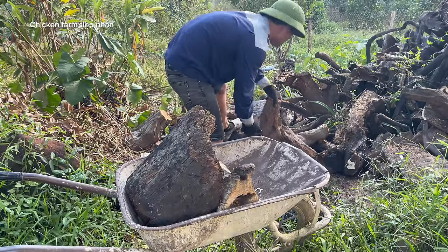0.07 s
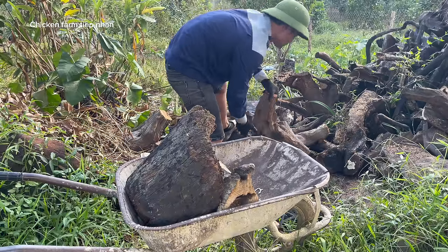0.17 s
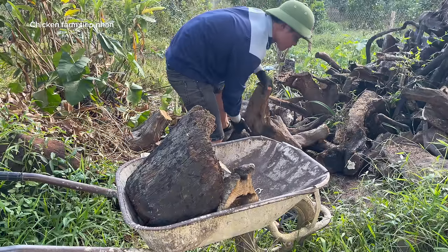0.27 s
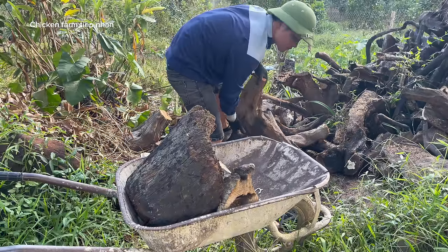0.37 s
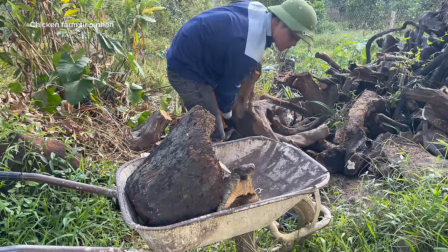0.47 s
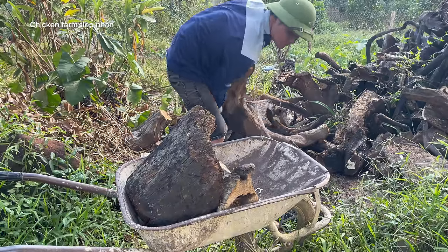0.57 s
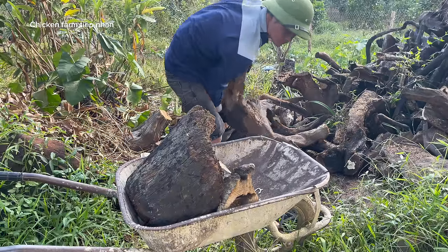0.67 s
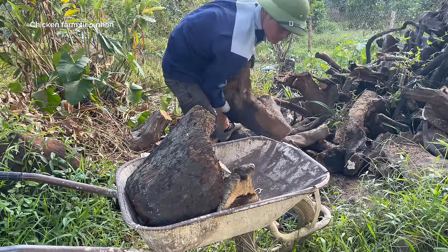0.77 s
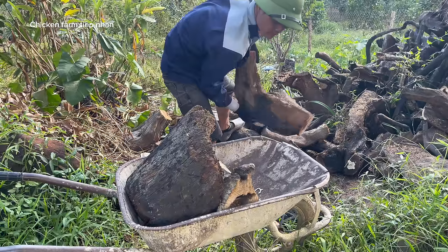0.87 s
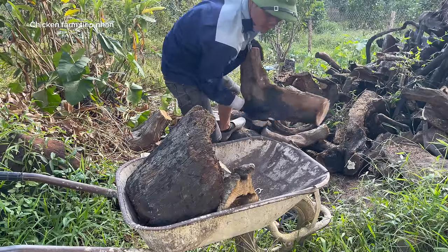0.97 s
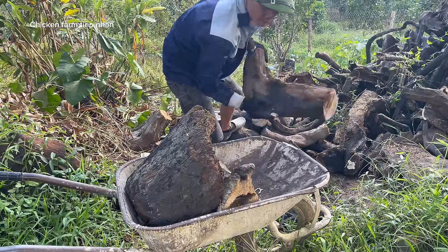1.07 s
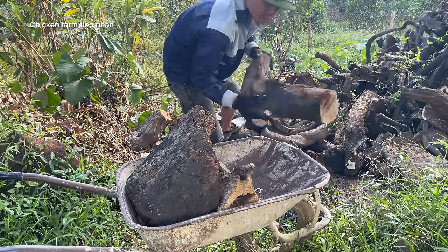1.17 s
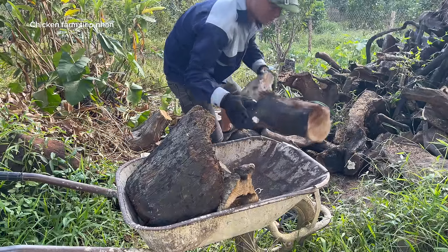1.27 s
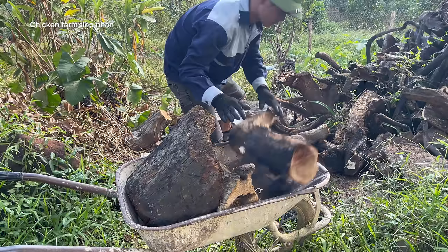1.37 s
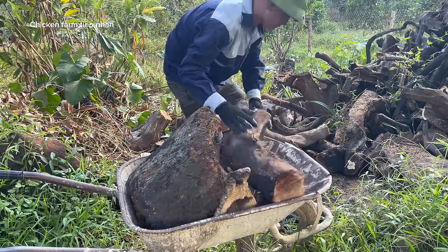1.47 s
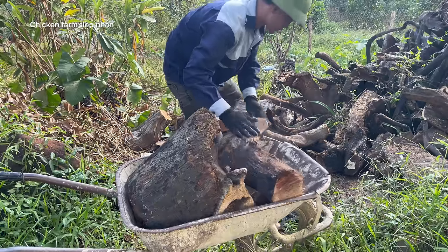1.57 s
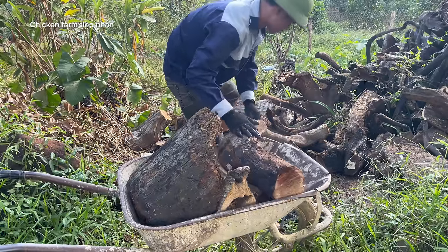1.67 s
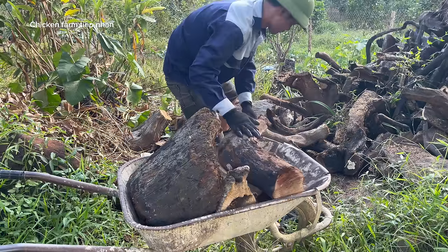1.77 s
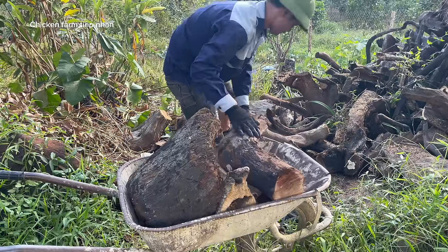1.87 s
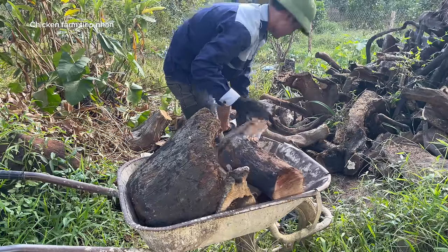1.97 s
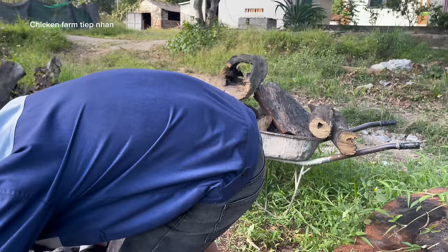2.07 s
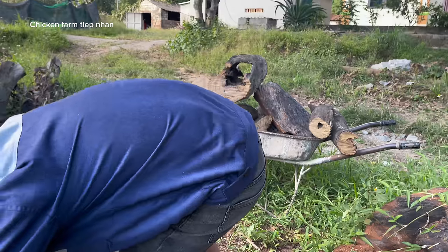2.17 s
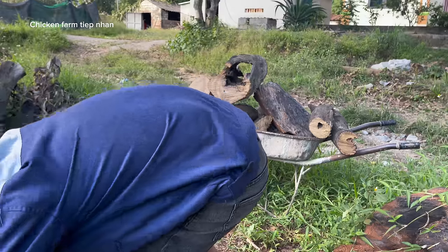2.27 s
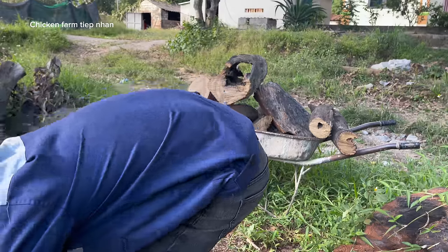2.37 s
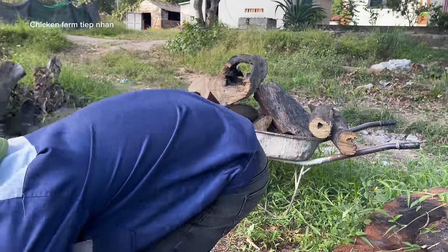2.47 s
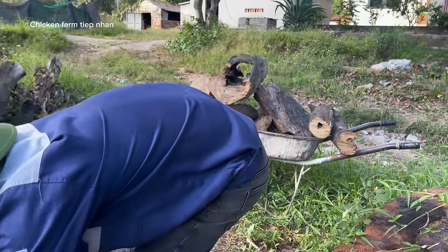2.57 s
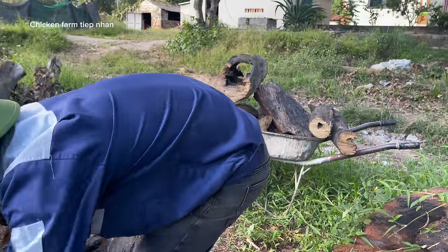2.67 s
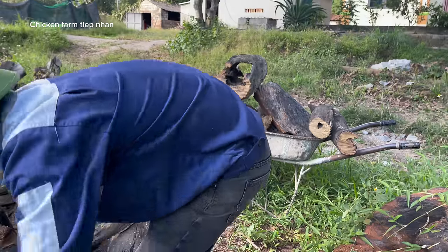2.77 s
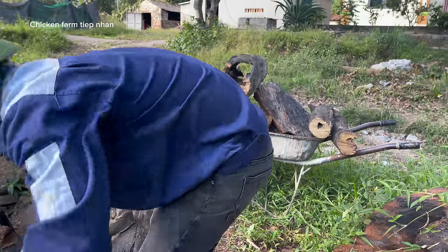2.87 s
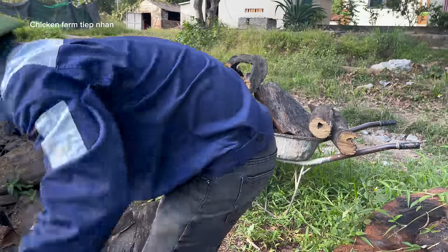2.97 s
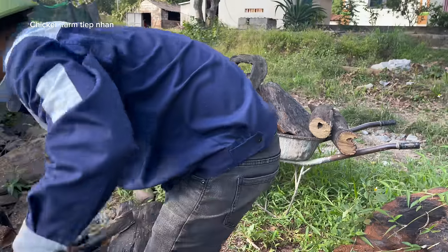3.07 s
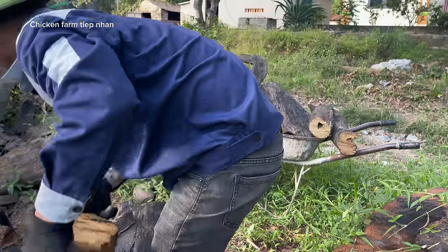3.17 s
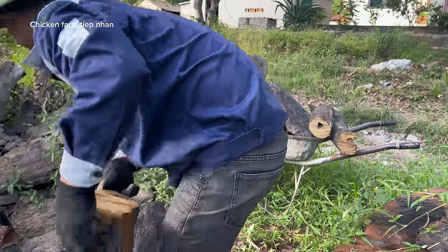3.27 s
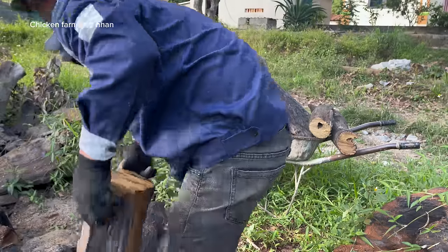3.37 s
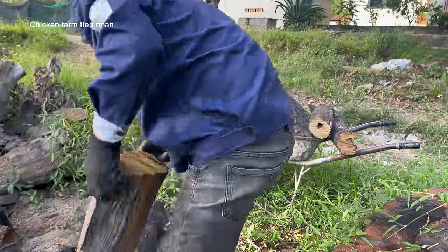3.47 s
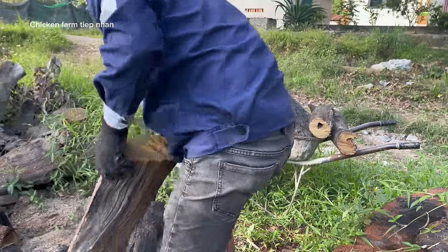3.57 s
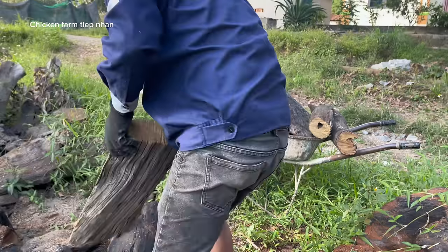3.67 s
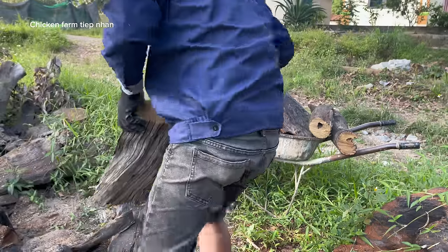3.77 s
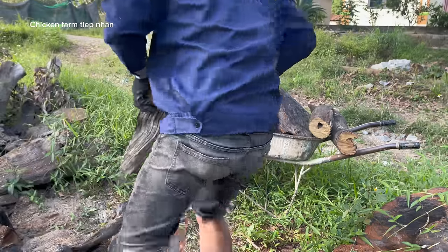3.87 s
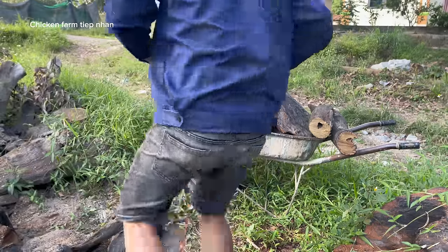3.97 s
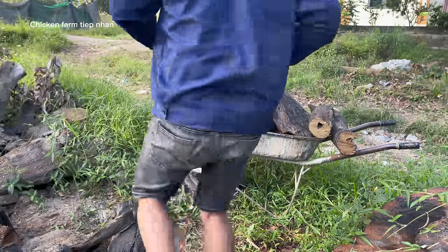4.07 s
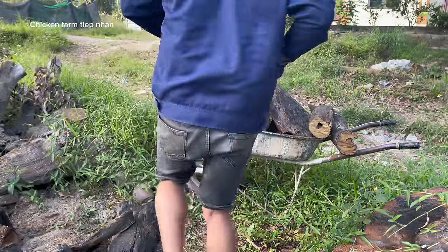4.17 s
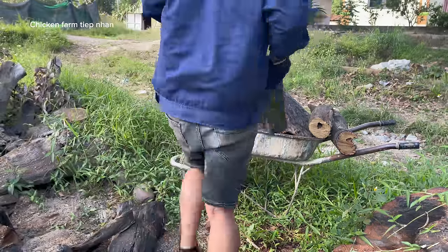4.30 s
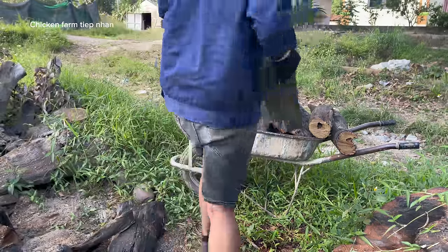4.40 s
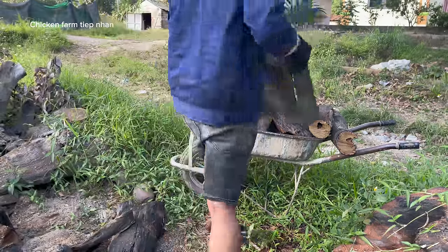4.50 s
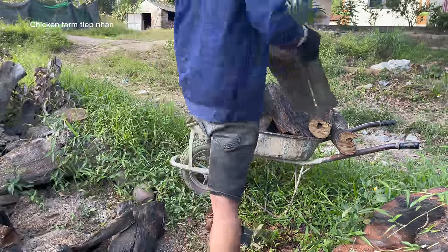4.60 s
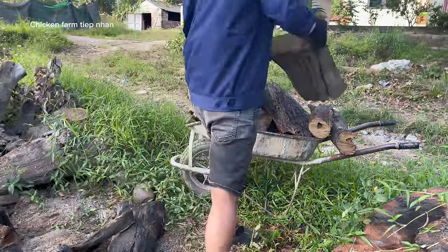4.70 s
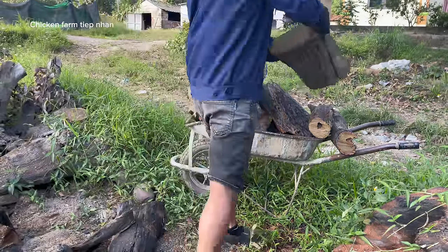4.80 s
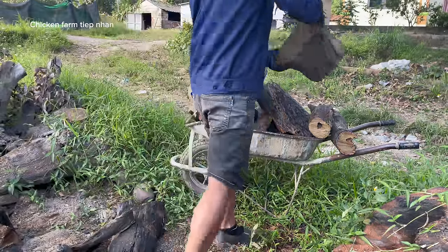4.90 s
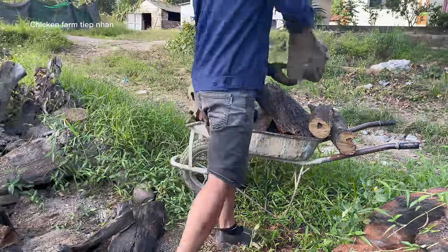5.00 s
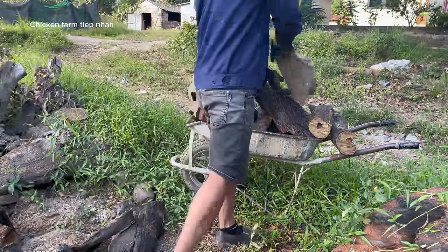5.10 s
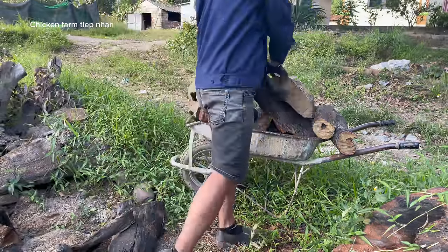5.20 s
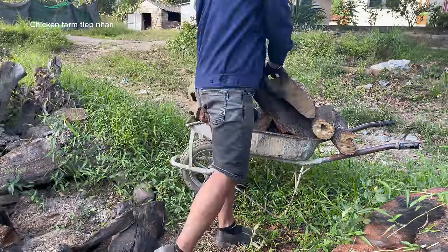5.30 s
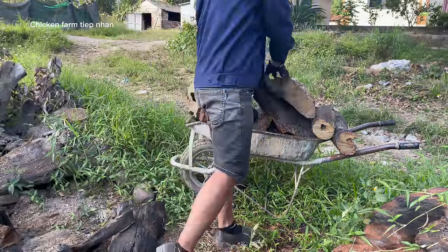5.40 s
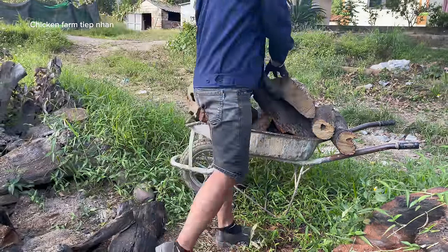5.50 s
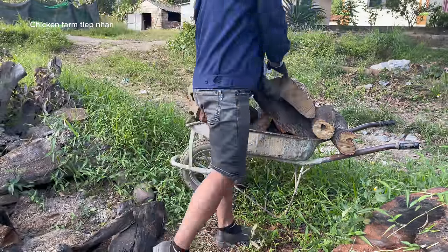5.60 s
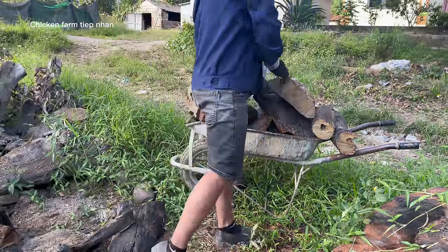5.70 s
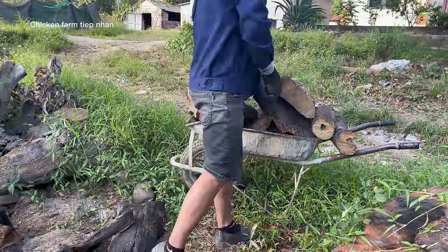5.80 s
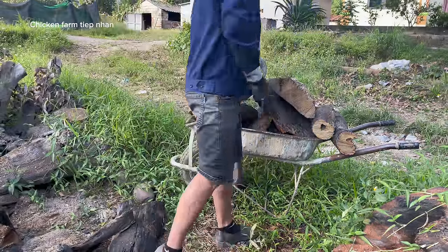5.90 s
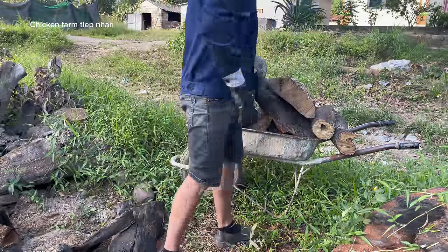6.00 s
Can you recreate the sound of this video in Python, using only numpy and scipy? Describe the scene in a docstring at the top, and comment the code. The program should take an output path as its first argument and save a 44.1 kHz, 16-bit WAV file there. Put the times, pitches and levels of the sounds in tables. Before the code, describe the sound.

Soft wind rumble, a faint high insect trill and light log scuffs come first. A log crashes into a hollow metal tray, booming, rocking and rattling away within about half a second. After that, dry grass crackles, twigs snap and wood bumps as a worker pulls and carries another piece, then throws it onto piled wood with a quieter, damped knock and metallic clatter. Dry open air, close stereo pickup.

```python
"""Farm plot: a log drops into a nearly empty steel wheelbarrow, which bangs, rocks and rattles as decaying modes.
More wood is pulled from a heap, carried through grass and thrown on the now loaded barrow.
Wood knocks are short modes, twigs and bark snap as noise bursts, grass and clothes rustle as grainy noise.
Wind is low noise, the drone a wavering tone with noise around it, the insect a pulsed high tone."""
import sys
import numpy as np
from scipy import signal
from scipy.fft import rfft, irfft, next_fast_len
from scipy.io import wavfile
from scipy.ndimage import map_coordinates

SR = 44100
rng = np.random.default_rng(int(sys.argv[2]) if len(sys.argv) > 2 else 0)


def file_out(sig):
    """Save sig as 16-bit WAV at sys.argv[1]."""
    # one column per channel
    cols = np.atleast_2d(sig).T
    # limit, then scale
    lim = np.clip(cols, -1, 1)
    pcm = np.round(lim * 32767).astype(np.int16)
    wavfile.write(sys.argv[1], SR, pcm)


N = 266716

# Levels are before placing. Spectra and mode levels are relative: the sound is normalised after them.
# Log landing or bumping in the barrow: start_s, ring_db, thump_db, rattle_db, bark_db
BLOWS = [(1.462, -20.5, -25, -17, -34), (1.4684, -9.5, -12.5, -17.5, -20.5),
         (1.480, -13.5, -15, -28.5, -21), (1.503, -17, -40, -31, -21), (1.513, -22.5, -14.5, -21.5, -19),
         (1.609, -26, -45, -39, -53), (1.649, -31.5, -23, -29.5, -34), (1.667, -28, -26, -30, -54),
         (1.757, -43, -32, -37, -47), (1.846, -70, -53, -45.5, -45), (5.171, -42.5, -42.5, -33, -27.5),
         (5.179, -28.5, -38.5, -34, -48.5), (5.1894, -17, -23.5, -27, -22), (5.204, -22, -19, -32.5, -33.5),
         (5.229, -31.5, -21.5, -30.5, -34), (5.382, -60, -41, -46.5, -51.5), (5.482, -61, -62, -50.5, -57)]
# Run of ever weaker contacts: start_s, fall_db_per_s, ring_db, thump_db, rattle_db, bark_db
ROCKS = [(1.543, 105, -27.5, -31, -24, -23.5), (1.693, 165, -26.5, -22, -32, -33),
         (5.276, 236, -33.5, -30, -36.5, -48.5)]
# Main modes, barrow with one log in it: pitch_hz, level_db, t60_s
LIGHT_MODES = [(233, -2.5, 0.22), (281, -5, 0.15), (305.8, -1, 0.17), (350, 2.5, 0.25), (406, -0.5, 0.23),
               (465, 1, 0.34), (490, -1.5, 0.35), (569, -5, 0.36), (606, -0.5, .3), (847, -8.5, 0.46),
               (920, -10, 0.36), (1004, -14, .4), (1004, -16, 0.26), (1270, -36, .5), (1338, -28, 0.97),
               (1347, -20, 0.6), (2025, -19, 0.54)]
# Main modes, barrow piled with wood: pitch_hz, level_db, t60_s
LOADED_MODES = [(253.7, -13, 0.12), (282, 2.5, 0.17), (363, -4, 0.091), (460, -13.5, .17),
                (517.4, 3.5, .28), (570, -3, 0.11), (700, -10.5, 0.096), (724, 2, .12), (831, 0, 0.25),
                (885, -14, 0.29), (1080, 5.5, 0.03), (1182, 2.5, 0.19), (1406, -11, 0.45),
                (2075, -25.5, 0.15)]
# Crowd of weaker sheet modes: pitch_hz, level_db
SHEET_LEVELS = [(120, -13.5), (200, -0.5), (400, 0), (620, 3), (760, -8.5), (950, -5), (1200, -10),
                (2000, -12), (3000, -12.5), (5000, -19)]
# Loose-part rattle, also wood scuff: frequency_hz, density_db_per_hz
RATTLE_SPECTRUM = [(350, -29.5), (700, 1), (1000, -1), (1600, 0.5), (2500, -5.5), (4300, -12), (5500, -21),
                   (9000, -30.5), (12000, -46)]
# Bark crushed by a blow: frequency_hz, density_db_per_hz
BARK_SPECTRUM = [(1000, -17.5), (2500, -5), (4200, -2), (5500, -4), (7000, -4), (9000, 2), (10300, 4),
                 (11500, -6), (12600, -15), (13200, -65)]
# Swings of a thump: pitch_ratio, gain
THUMP_SWINGS = [(0.63, -0.3), (1, 0.51), (1.35, -0.48), (1.95, 0.33)]
# Wood on wood: start_s, lower_mode_db, lower_hz, upper_hz, then relative to the lower mode upper_db,
# t60_s, and again relative to it thud_db, scuff_db
KNOCKS = [(0.048, -42, 710, 1530, 3, 0.039, -19, -2), (1.923, -26.5, 513.5, 2100, -14, 0.11, -22.5, -11.5),
          (2.447, -45, 1380, 1676, -0.5, 0.12, -12, -4), (2.470, -42.5, 816, 1690, -16, 0.026, -11, -9),
          (2.624, -37.5, 400, 1300, -5, 0.057, 2.5, -14), (2.763, -47.5, 868, 1087, 5, 0.19, -11, -3.5),
          (2.828, -49.5, 880, 1275, 4, 0.043, 9.5, -1), (3.073, -37, 264.3, 567, -23, 0.151, 5.5, -10),
          (3.095, -26, 560, 2085, -9, 0.027, -3.5, -4.5), (3.139, -41, 670, 1980, -26, 0.088, -13, -12),
          (3.954, -34.5, 608, 1070, -1, 0.068, -3, -13), (3.957, -32, 356, 498, -1, 0.046, -13, -20),
          (3.963, -39, 1125, 2360, -5, 0.056, -10, -17), (5.1895, -8.5, 580, 896, 0.5, 0.049, -22, -16.5),
          (5.192, -15.5, 1516, 1954, -6, 0.042, -16, -8), (5.276, -22, 1170, 2220, -9, 0.018, -21, -4)]
# Light clack of thin sticks: start_s, lower_mode_db, lower_hz
TAPS = [(0.147, -58, 1760), (0.221, -63, 1830), (0.368, -61, 1950), (0.508, -52.5, 1937), (2.017, -47, 983),
        (2.247, -51, 1407), (2.284, -50.5, 1594), (2.363, -47.5, 1620), (2.714, -61, 1340),
        (4.983, -55, 1390), (5.891, -56, 1186), (5.995, -61, 1184)]
# Twig and bark snaps: start_s, level_db (before SNAP_TRIM_DB), tilt_db_per_octave
SNAPS = [(.049, -31, -7), (2.2455, -30, 13.5), (2.446, -27, 2.5), (2.470, -41, -4), (2.62, -36, -2),
         (2.708, -35.5, 2.5), (2.761, -24.5, 6), (2.776, -29, 10.5), (2.825, -31, 11.5), (3.096, -32.5, 7),
         (3.369, -42, 13.5), (3.546, -41.5, -1.5), (3.724, -37.5, 10), (3.767, -40, 12), (3.859, -34, 2.5),
         (4.503, -35.5, -5), (4.543, -30.5, -5), (4.56, -24.5, -1.5), (5.012, -41, -5.5), (5.134, -41.5, 7),
         (5.556, -41, -1.5), (5.807, -42, -2.5)]
# Twig snap noise, before tilt: frequency_hz, density_db_per_hz
TWIG_SPECTRUM = [(400, -32), (1200, -5), (2500, -7), (4200, 3.5), (6000, -2.5), (9000, 8.5), (10300, 11.5),
                 (12300, -19.5), (13500, -29.5), (15500, -20.5)]
# Log tugged over the heap, catching and sliding: start_s, grass_db, wood_db (before WOOD_TRIM_DB)
TUGS = [(.02, -58, -56), (.21, -58, -56), (.366, -64.5, -66), (0.515, -61.5, -59), (2.246, -42.5, -55.5),
        (2.358, -44, -51), (2.442, -52, -60), (2.7, -45, -48.5), (2.759, -45, -48.5)]
# Feet and logs brushing through grass and sticks: middle_s, half_length_s, grass_db, wood_db (before WOOD_TRIM_DB)
BRUSHES = [(1.349, 0.047, -54.5, -58.5), (2.141, 0.043, -54, -71), (2.577, 0.038, -64, -64),
           (3.019, 0.027, -55.5, -51), (3.107, 0.0544, -47.5, -51.5), (3.199, 0.042, -53, -62.5),
           (3.603, 0.017, -54.5, -74.5), (3.863, .045, -51.5, -56.5), (4.025, 0.13, -51, -57),
           (4.354, 0.039, -48, -60), (4.519, 0.05, -50.5, -55), (4.634, 0.057, -56, -59),
           (4.827, 0.041, -61.5, -79.5), (5.151, 0.018, -56.5, -53), (5.922, 0.0086, -61, -56)]
# Steady stir of the worker: time_s, grass_and_cloth_db, dragged_wood_db (before WOOD_TRIM_DB)
STIR = [(0, -68.5, -65), (.75, -81, -72), (1.42, -71.5, -66), (1.95, -59.5, -52), (2.22, -64.5, -63.5),
        (2.5, -57.5, -57.5), (3.0, -60.5, -62.5), (3.4, -64.5, -70), (4.3, -59, -65.5), (5.0, -67, -65.5),
        (6.05, -63, -67)]
# Dry grass noise: frequency_hz, density_db_per_hz
GRASS_SPECTRUM = [(1200, -24), (2300, -7.5), (4000, -8.5), (6000, -5), (8000, 0.5), (10000, 7),
                  (10800, 5.5), (12000, -14), (13000, -26.5), (14500, -48)]
# Dragged wood noise: frequency_hz, density_db_per_hz
DRAG_SPECTRUM = [(120, -46), (200, -2.5), (296, 5), (426, -0.5), (849, -3.5), (993, -11.5), (1060, -7),
                 (1830, -6), (4500, -12), (5850, -46.5), (9900, -120)]
# Jacket sleeves sweeping past the body: middle_s, half_length_s, level_db
SWISHES = [(0.976, 0.15, -65), (1.35, 0.06, -64.5), (4.36, 0.063, -61.5), (4.98, 0.13, -63.5),
           (5.91, 0.024, -54.5)]
# Cloth noise: frequency_hz, density_db_per_hz
CLOTH_SPECTRUM = [(300, -12), (900, -7), (2500, -2), (4200, -2.5), (5500, -13.5), (9500, 1.5), (12500, -37)]
# Gusts on the microphone: time_s, level_db (before WIND_TRIM_DB)
WIND = [(0, -54), (1.1, -73), (2.2, -67), (2.8, -63.5), (3.2, -68), (4.8, -69), (5.7, -66), (6.05, -69.5)]
# Wind rumble: frequency_hz, density_db_per_hz
WIND_SPECTRUM = [(15, -18.5), (30, -18), (50, -2), (80, -7.5), (130, -8.5), (220, -22), (400, -38),
                 (900, -83.5)]
# Low drone: time_s, level_db (before DRONE_TRIM_DB), mean_pitch_hz
DRONE = [(0, -70, 57.98), (.5, -55.5, 52.01), (.9, -46.5, 53.04), (1.35, -48, 52.94), (1.9, -49.5, 65),
         (3.2, -50.5, 66), (3.7, -56, 66.05), (4.15, -47.5, 66.02), (4.42, -48.5, 66.3), (4.55, -60, 65.7),
         (4.68, -44.5, 65.1), (4.8, -50, 66.36), (5.15, -51, 65.7), (5.55, -60, 66.24), (5.75, -54, 65.1),
         (6.05, -54, 66)]
# Noise around the drone: frequency_hz, density_db_per_hz
HUM_SPECTRUM = [(30, -41), (48, -14), (64, 1.5), (85, -6), (120, -11), (180, -20.5), (400, -47.5),
                (900, -79.5)]
# Open-air hiss: frequency_hz, density_db_per_hz
AIR_SPECTRUM = [(150, 3.5), (400, 3), (800, -4), (1200, -8), (2000, -14), (4000, -21.5), (6000, -38),
                (9800, -21.5), (11000, -34), (12500, -63)]
# Barrow position: frequency_hz, left_minus_right_db
BARROW_LEFT = [(100, 1.5), (1000, 1.9), (2000, 1.5), (3800, 4), (5300, 4.5), (7200, 6.5), (7900, 2.2),
               (12000, -1.5)]
# Worker position: frequency_hz, left_minus_right_db
WORKER_LEFT = [(100, 2), (500, 4), (1900, 4.5), (5300, 6), (7200, 4.5), (7900, 1.3), (12000, -1)]
# Phase between the two ports: frequency_hz, left_lead_rad
PORT_LEAD = [(1900, 0), (3000, .6), (4000, .1), (7100, .05), (7800, .7), (8700, -.2), (9500, -2),
             (10200, -3.1), (11000, -4.3), (11800, -6.28)]
# Scatter off ground and heap: frequency_hz, gain_db
SCATTER_GAIN = [(150, -25.5), (600, -14), (2000, -10.5), (10000, -18)]
# Top treble roll-off: frequency_hz, gain_db
TREBLE_GAIN = [(12500, 0), (13400, -4.5)]

LOADED_FROM_S = 2.2  # piled with wood from here on
TRAY_LOW_HZ = 62  # below this the small tray moves little air
ROCK_GAP_S, ROCK_JITTER_S, ROCK_SCATTER_DB = 0.022, 0.004, 0.5
ROCK_THUMP_LOSS_DB = 9  # only the first contact of a run carries the log's full weight
TAP_RATIO, TAP_T60_S = 1.45, 0.07  # ratio: upper mode over lower
TAP_UPPER_DB, TAP_THUD_DB, TAP_SCUFF_DB = -3, -9, -0.5  # relative to the lower mode
CRACKLE_FROM_S, CRACKLE_TO_S, CRACKLE_MEAN_DB = 2.25, 6.0, -47  # chance snaps, mean before SNAP_TRIM_DB
SNAP_TRIM_DB, WOOD_TRIM_DB, WIND_TRIM_DB, DRONE_TRIM_DB = -3.5, -3, 6.5, 1
TUG_ATTACK_S, TUG_T60_S = 0.0041, 0.3
INSECT_MEAN_HZ, INSECT_DB, INSECT_UNTIL_S = 8020, -79, 1.4
PULSE_HZ, PHRASE_HZ = 32, 7.4  # insect pulses and phrases per second
TOP_HZ = 15800


def amp(db):
    """Decibels to gain."""
    return 10 ** (np.asarray(db) / 20)


def unit(x):
    """Scale to rms 1."""
    return x / np.sqrt(np.mean(x ** 2) + 1e-20)


def along(points, hz):
    """Interpolate (Hz, value) points on a log axis."""
    f, v = np.transpose(points)
    return np.interp(np.log(hz + 1), np.log(f + 1), v)


def curves(rows):
    """One value per sample for each column after the time."""
    time_s, *columns = np.transpose(rows)
    return [np.interp(np.arange(N) / SR, time_s, column) for column in columns]


def wobble(knots_per_s):
    """Smooth random curve through normal-distributed knots."""
    knots = rng.standard_normal(int(N * knots_per_s / SR) + 4)
    return map_coordinates(knots, [np.arange(N) * knots_per_s / SR])


def swells(rows):
    """Gaussian rise and fall for each (middle_s, half_length_s, level_db) row."""
    t = np.arange(N) / SR
    return sum(amp(db) * np.exp(-((t - middle_s) / half_s) ** 2) for middle_s, half_s, db in rows)


def filtered(x, response):
    """Multiply the spectrum of x by a response of frequency."""
    n = x.shape[-1]
    padded = next_fast_len(n + 8192)
    return irfft(rfft(x, padded) * response(np.fft.rfftfreq(padded, 1 / SR)), padded)[..., :n]


def noise(spectrum, size, spiky_db=0, tilt_db=0):
    """Coloured noise of rms 1; spiky_db spreads the sizes of its 16-sample grains."""
    sizes_db = spiky_db * np.clip(rng.standard_normal(size // 16 + 1), -2.5, 2.5)
    rough = rng.standard_normal(size) * amp(sizes_db).repeat(16)[:size]
    return unit(filtered(rough, lambda hz: amp(along(spectrum, hz) + tilt_db * np.log2(hz + 1))))


def fade(t, attack_s, t60_s):
    """Quick rise and exponential decay."""
    return (1 - np.exp(-t / attack_s)) * np.exp(-np.log(1000) * t / t60_s)


def add(track, start_s, sound):
    """Mix a sound into the track."""
    part = track[round(start_s * SR):][:len(sound)]
    part += sound[:len(part)]


def ringing(hz, t60_s, t):
    """One decaying sine per mode."""
    hz, t60_s, t = (np.float32(v) for v in (hz, t60_s, t))
    return np.sin(2 * np.pi * hz[:, None] * t) * fade(t, 0.00057, t60_s[:, None])


def grains(count, centre_hz, cycles, spread_db):
    """Many tiny ticks of rms 1 together, each with its own pitch and size, t60 a set number of cycles."""
    start = rng.integers(0, N, count)
    hz = np.minimum(centre_hz * np.exp(rng.normal(0, 0.45, count)), TOP_HZ)
    size = amp(spread_db * np.minimum(rng.exponential(1, count), 4))
    steps = np.arange(SR // 50)
    ticks = size[:, None] * ringing(hz, cycles / hz, steps / SR)
    return unit(np.bincount((start[:, None] + steps).ravel(), ticks.ravel(), N)[:N])


def thump(t, hz, t60_s):
    """A heavy log's push: a few low, well damped swings."""
    swings = sum(np.sin(2 * np.pi * hz * ratio * rng.uniform(0.92, 1.082) * t) * gain
                 for ratio, gain in THUMP_SWINGS)
    return swings * fade(t, 0.00068, t60_s)


def barrow(blows, modes, sheet_db, sheet_t60_s, rattle_t60_s, bark_t60_s, thump_hz, shift):
    """Each blow rings the same tray modes at new strengths, shakes loose parts and crushes bark."""
    out, t = np.zeros(N), np.arange(SR // 2) / SR
    brief = t[:SR // 4]
    hz, mode_db, t60_s = np.transpose(modes)
    main = ringing(hz, t60_s, t)
    # a thin sheet has crowded modes; the high ones die sooner
    crowd_hz = np.linspace(140 ** 0.5, 5000 ** 0.5, 150) ** 2 + rng.uniform(-7, 7, 150)
    crowd = ringing(crowd_hz, sheet_t60_s * (crowd_hz / 1000) ** -0.15, t)
    for start_s, ring_db, thump_db, rattle_db, bark_db in blows:
        strike = amp(mode_db + rng.normal(0, 1.5, len(hz))) * rng.choice([-1, 1], len(hz))
        spread = amp(along(SHEET_LEVELS, crowd_hz)) * rng.choice([-1, 1], len(crowd_hz))
        ring = strike @ main / np.linalg.norm(strike)
        ring += amp(sheet_db) * spread @ crowd / np.linalg.norm(spread)
        # first swings strongest: the log pressing on the sheet soon damps them
        ring *= 1 + 1.4 * np.exp(-t / 0.0053)
        # the log's weight moves about and shifts the modes a little
        ring = np.interp(t * (1 + shift * rng.uniform(-1, 1)), t, ring)
        rattle = noise(RATTLE_SPECTRUM, len(brief), spiky_db=1.5) * fade(brief, 0.0014, rattle_t60_s)
        bark = noise(BARK_SPECTRUM, len(brief), spiky_db=2) * fade(brief, 0.00036, bark_t60_s)
        add(out, start_s, amp(ring_db) * ring)
        add(out, start_s, amp(thump_db) * thump(brief, thump_hz, t60_s=0.17))
        add(out, start_s, amp(rattle_db) * rattle)
        add(out, start_s, amp(bark_db) * bark)
    return out


def rocking():
    """Contacts of a rocking log: blows weakening steadily, slightly uneven in time and strength."""
    blows = []
    for start_s, fall_db_per_s, *levels_db in ROCKS:
        blows.append((start_s, *levels_db))
        for k, (late, strong) in enumerate(rng.standard_normal(size=(7, 2)), 1):
            after_s = k * ROCK_GAP_S + ROCK_JITTER_S * late
            change_db = ROCK_SCATTER_DB * strong - fall_db_per_s * after_s
            thump_loss_db = ROCK_THUMP_LOSS_DB * np.array([0, 1, 0, 0])
            blows.append((start_s + after_s, *(levels_db + change_db - thump_loss_db)))
    return blows


def knocks():
    """Logs and sticks bump: two short wooden modes and a scuff over a dull thud."""
    out, t = np.zeros(N), np.arange(SR // 5) / SR
    taps = [(start_s, db, hz, TAP_RATIO * hz, TAP_UPPER_DB, TAP_T60_S, TAP_THUD_DB, TAP_SCUFF_DB)
            for start_s, db, hz in TAPS]
    for start_s, db, lower_hz, upper_hz, upper_db, t60_s, thud_db, scuff_db in KNOCKS + taps:
        ring = amp([0, upper_db]) @ ringing([lower_hz, upper_hz], [t60_s, 0.98 * t60_s], t)
        scuff = amp(scuff_db) * noise(RATTLE_SPECTRUM, len(t), spiky_db=3.5) * fade(t, 0.00067, t60_s)
        thud = amp(thud_db) * thump(t, hz=146.0, t60_s=0.14)
        add(out, start_s, amp(db) * (ring + scuff + thud))
    return out


def snaps():
    """Dry twigs and bark break with a tick and a brief crumble; fainter snaps fall by chance."""
    out, t = np.zeros(N), np.arange(SR // 10) / SR
    faint = [(rng.uniform(CRACKLE_FROM_S, CRACKLE_TO_S), CRACKLE_MEAN_DB + 2 * rng.normal(), tilt_db)
             for tilt_db in rng.normal(2.6, 1.4, size=18)]
    shape = fade(t, 0.000092, 0.015) + amp(-13) * fade(t, 0.0022, 0.039)
    for start_s, db, tilt_db in SNAPS + faint:
        crack = noise(TWIG_SPECTRUM, len(t), spiky_db=2, tilt_db=tilt_db)
        add(out, start_s, amp(db + SNAP_TRIM_DB) * shape * crack)
    return out


def rustle():
    """Grass and clothes crackle as the worker moves; wood stutters over the heap at each tug."""
    stir_grass_db, stir_wood_db = curves(STIR)
    tug_grass, tug_wood = np.zeros(N), np.zeros(N)
    slide = fade(np.arange(SR // 2) / SR, TUG_ATTACK_S, TUG_T60_S)
    for start_s, grass_db, wood_db in TUGS:
        add(tug_grass, start_s, amp(grass_db) * slide)
        add(tug_wood, start_s, amp(wood_db) * slide)
    brush_grass = swells((s, half_s, db) for s, half_s, db, _ in BRUSHES)
    brush_wood = swells((s, half_s, db) for s, half_s, _, db in BRUSHES)
    # unrelated movements add in power
    grass_level = np.linalg.norm([amp(stir_grass_db), tug_grass, brush_grass], axis=0)
    wood_level = np.linalg.norm([amp(stir_wood_db), tug_wood, brush_wood], axis=0)
    grass = noise(GRASS_SPECTRUM, N, spiky_db=4)
    grass += amp(-12) * grains(count=1500, centre_hz=5930, cycles=22, spread_db=3)
    drag = noise(DRAG_SPECTRUM, N, spiky_db=3.5)
    drag += amp(-3) * grains(count=2400, centre_hz=1130, cycles=22, spread_db=1.5)
    grass *= grass_level * amp(1.4 * wobble(50))
    drag *= wood_level * amp(WOOD_TRIM_DB + 1.2 * wobble(45))
    return grass + drag


def swishes():
    """Cloth noise swells and fades as the arms swing a log."""
    return swells(SWISHES) * noise(CLOTH_SPECTRUM, N, spiky_db=2)


def wind():
    """Gusts on the microphone: low noise with a wavering level."""
    (wind_db,) = curves(WIND)
    return amp(wind_db + WIND_TRIM_DB + 1.8 * wobble(20)) * noise(WIND_SPECTRUM, N)


def drone():
    """A low sine of wavering pitch and level with noise around it."""
    drone_db, drone_hz = curves(DRONE)
    tone = np.sin(2 * np.pi * np.cumsum(drone_hz + 0.8 * wobble(8.7)) / SR)
    level = amp(drone_db + DRONE_TRIM_DB + 1.2 * wobble(9))
    return level * unit(tone + amp(-3) * noise(HUM_SPECTRUM, N))


def insect():
    """Broken trill: a high, unsteady tone gated by pulses and slower phrases."""
    t = np.arange(N) / SR
    pulses = np.sin(np.pi * PULSE_HZ * t) ** 2
    phrases = np.clip(np.sin(2 * np.pi * PHRASE_HZ * t) + 0.5 + 0.14 * wobble(5), 0, 1)
    tone = np.sin(2 * np.pi * np.cumsum(INSECT_MEAN_HZ + 45 * wobble(150)) / SR)
    return amp(INSECT_DB) * unit(pulses * phrases * tone) * (t < INSECT_UNTIL_S)


def open_air():
    """Steady hiss from all round, unrelated at the two ports."""
    return amp(-64) * np.array([noise(AIR_SPECTRUM, N), noise(AIR_SPECTRUM, N)])


def placed(mono, left):
    """Stereo source with scatter off ground and heap; port phase and level differences vary with frequency."""
    t = np.arange(SR // 4) / SR
    scatter = rng.standard_normal((2, len(t))) * fade(t, 0.0079, 0.16)
    echo = signal.fftconvolve(mono[None], scatter / np.linalg.norm(scatter[0]), axes=1)[:, :N]
    echo = filtered(echo, lambda hz: amp(along(SCATTER_GAIN, hz)))
    direct = filtered(mono, lambda hz: np.exp(1j * np.outer([0.5, -0.5], along(PORT_LEAD, hz))))
    return filtered(direct + echo, lambda hz: amp(np.outer([0.5, -0.5], along(left, hz))))


def scene():
    """Barrow almost ahead, worker and heap further left, in open air."""
    blows = BLOWS + rocking()
    light_blows = [b for b in blows if b[0] < LOADED_FROM_S]
    loaded_blows = [b for b in blows if b[0] > LOADED_FROM_S]
    light = barrow(light_blows, LIGHT_MODES, sheet_db=-2.5, sheet_t60_s=0.34, rattle_t60_s=0.12,
                   bark_t60_s=0.1, thump_hz=131.4, shift=0.02)
    loaded = barrow(loaded_blows, LOADED_MODES, sheet_db=-1.5, sheet_t60_s=0.31, rattle_t60_s=0.19,
                    bark_t60_s=0.15, thump_hz=111.4, shift=0.015)
    tray = filtered(light + loaded, lambda hz: 1j * hz / (TRAY_LOW_HZ + 1j * hz))
    worker = knocks() + snaps() + rustle() + swishes()
    background = wind() + drone() + insect()
    return placed(tray, BARROW_LEFT) + placed(worker + background, WORKER_LEFT) + open_air()


def record(dry):
    """Loud peaks are rounded, the top treble is softened, nothing sounds above TOP_HZ."""
    rounded = dry / (1 + np.abs(dry) ** 6) ** (1 / 6)
    return filtered(rounded, lambda hz: amp(along(TREBLE_GAIN, hz)) * (hz < TOP_HZ))


dry = scene()
out = record(dry)
file_out(out)
```